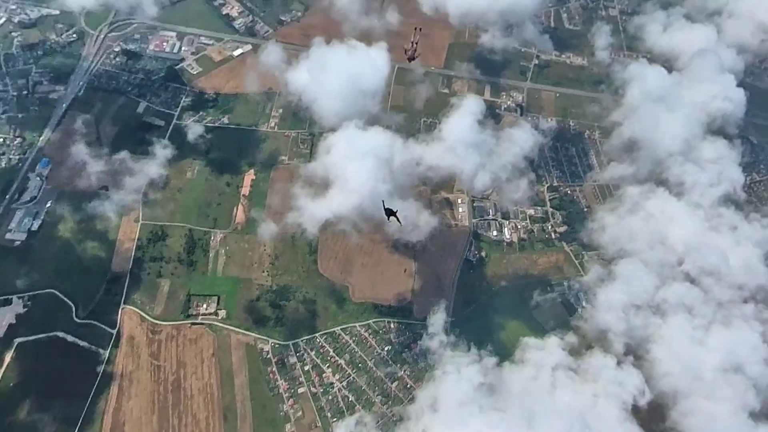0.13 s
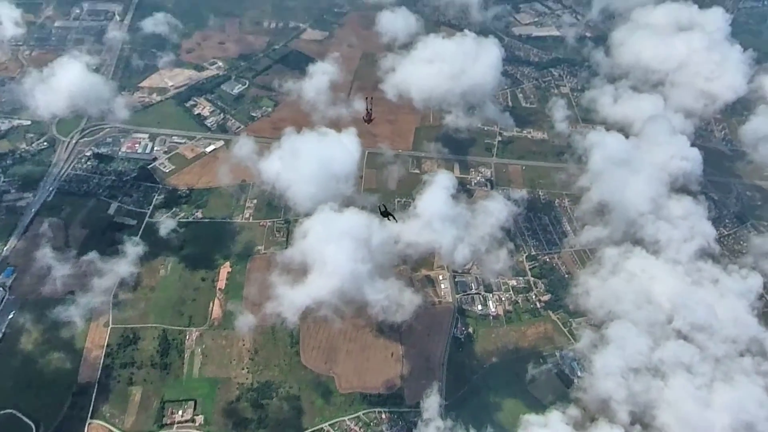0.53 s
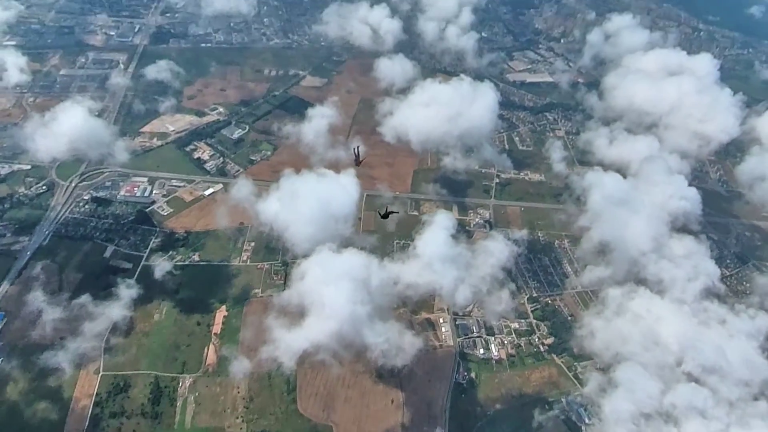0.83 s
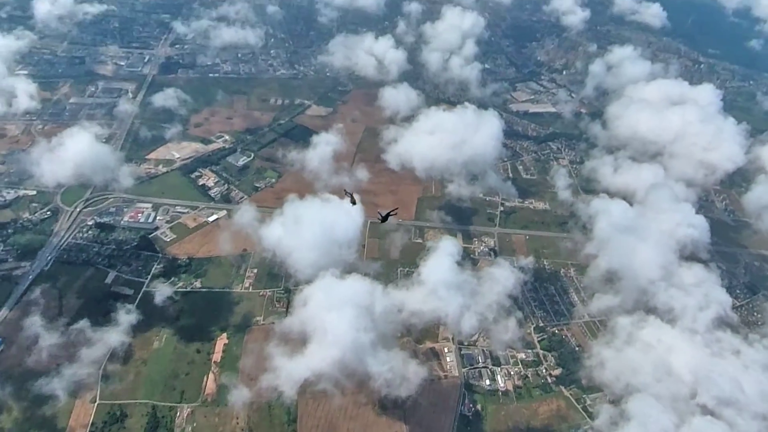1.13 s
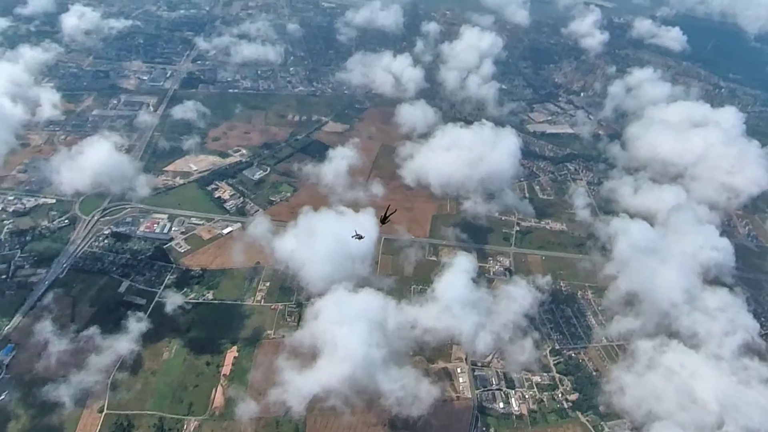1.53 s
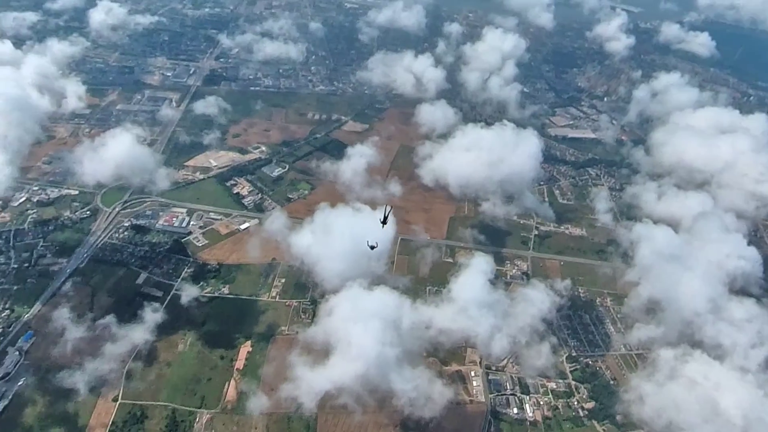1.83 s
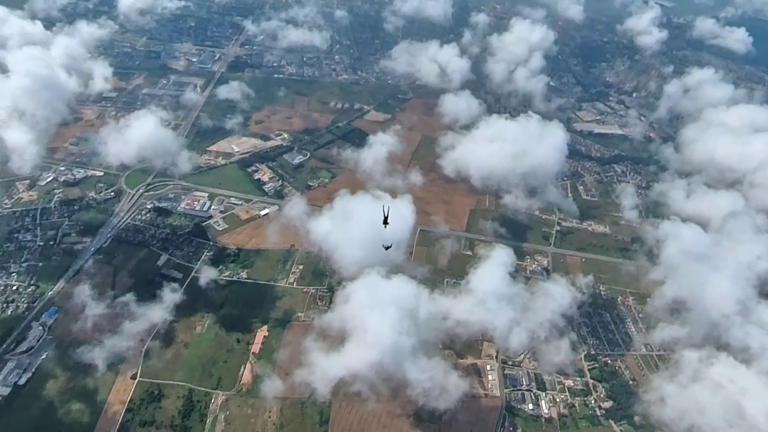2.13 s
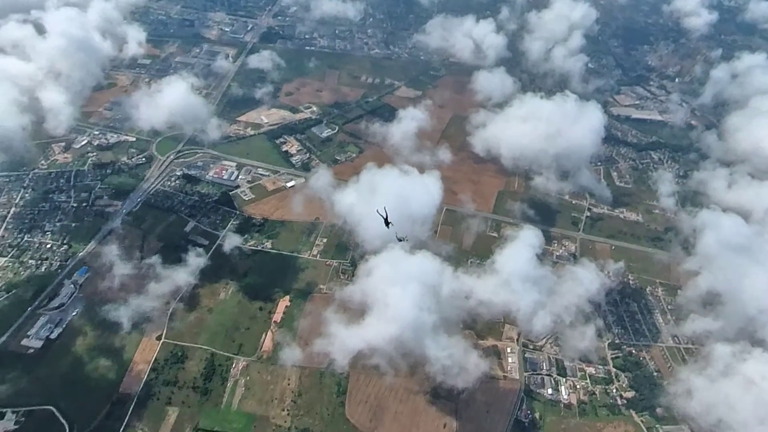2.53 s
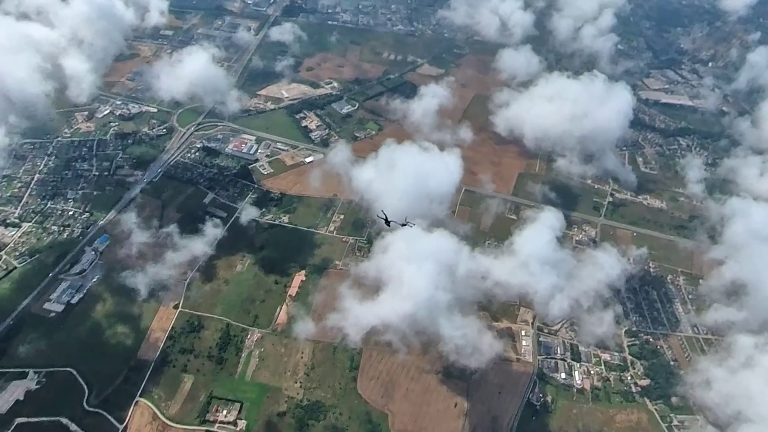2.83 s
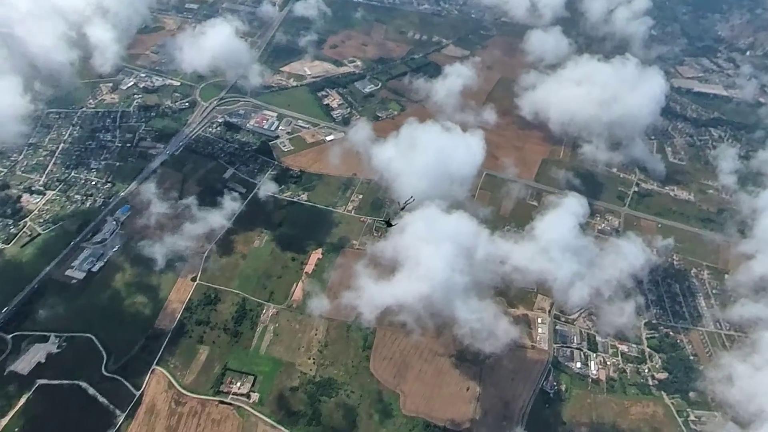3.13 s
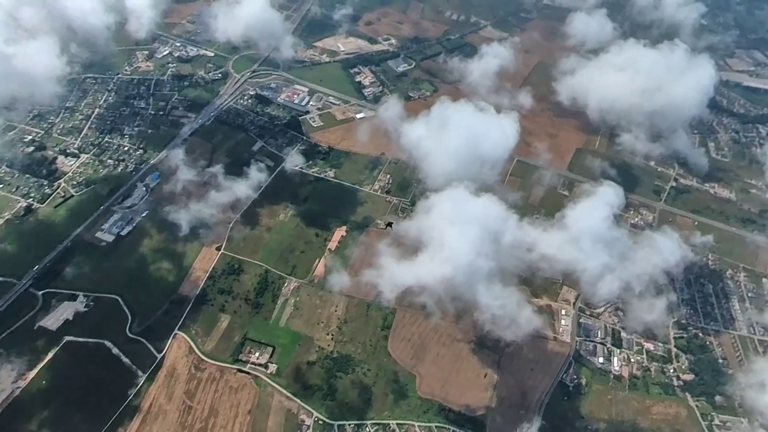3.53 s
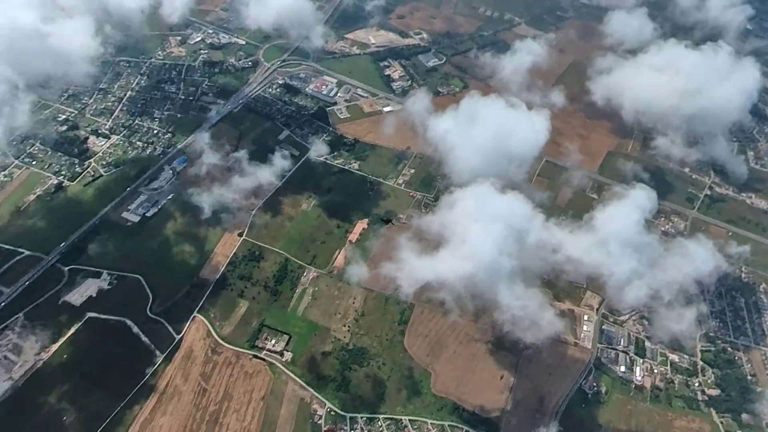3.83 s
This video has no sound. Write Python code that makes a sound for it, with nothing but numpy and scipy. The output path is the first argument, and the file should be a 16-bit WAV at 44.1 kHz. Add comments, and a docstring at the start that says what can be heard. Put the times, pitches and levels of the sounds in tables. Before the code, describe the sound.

Loud wind rushing over a falling camera's microphone, breaking into choppy flutters and swelling back unevenly

```python
"""Rushing air tears across the microphone of a falling camera: a low buffet, a roar, a midrange and a hiss,
all made of unevenly driven, filtered noise. The port slips into the lee for a moment, then takes the
full stream. Later the stream detaches and slaps back in choppy puffs, sinks, and returns in uneven swells.
Puffs are gated noise with a sinking tone over a pressure dip; slaps are rounded pushes, ticks are short
filtered clicks, and a brief whistle is a sliding narrow band of noise."""
import sys
import numpy as np
from scipy import signal
from scipy.fft import rfft, irfft, next_fast_len
from scipy.io import wavfile
from scipy.ndimage import uniform_filter1d, minimum_filter1d, map_coordinates

SR = 44100
rng = np.random.default_rng(int(sys.argv[2]) if len(sys.argv) > 2 else 0)


def transcribe(signal):
    """Save signal, clipped to [-1, 1], as a 16-bit WAV file at the path in sys.argv[1]."""
    frames = np.atleast_2d(signal).T
    limited = np.clip(frames, -1, 1)
    pcm = np.round(limited * 32767).astype(np.int16)
    wavfile.write(sys.argv[1], SR, pcm)


N = 176400  # samples in the scene: 4 s


def amp(db):
    """Turn decibels into a gain."""
    return 10 ** (np.asarray(db) / 20)


def unit(x):
    """Scale a sound to rms 1."""
    return x / np.sqrt(np.mean(x ** 2) + 1e-20)


def curves(rows):
    """Join the rows of a table with straight lines: one curve for each column after the time."""
    times, *columns = np.transpose(rows)
    t = np.arange(N) / SR
    return [np.interp(t, times, column) for column in columns]


def wobble(rate):
    """Draw a smooth curve through random points, rate of them a second."""
    points = rng.standard_normal(8192)
    return map_coordinates(points, [np.arange(N) * rate / SR], mode="wrap")


def coloured(x, points):
    """Filter x to a drawn frequency response, with the minimum-phase filter so nothing rings early."""
    size = next_fast_len(len(x) + 8192, True)
    hz, db = np.transpose(points)
    # the response is drawn on a logarithmic frequency scale
    level_db = np.interp(np.log(np.fft.rfftfreq(size, 1 / SR) + 1), np.log(hz + 1), db)
    # folding the cepstrum onto positive times makes the filter causal
    cepstrum = irfft(np.log(amp(level_db)), size)
    cepstrum[1:size // 2] *= 2
    cepstrum[size // 2 + 1:] = 0
    response = np.exp(rfft(cepstrum))
    return irfft(rfft(x, size) * response, size)[:len(x)]


def narrow_noise(hz, half_width_hz):
    """Make a narrow band of noise of rms 1 around a moving pitch: slow noise carried on a tone."""
    lowpass = signal.butter(3, half_width_hz, fs=SR, output="sos")
    a, b = signal.sosfilt(lowpass, rng.standard_normal((2, N)))
    phase = 2 * np.pi * np.cumsum(hz) / SR
    return unit(a * np.cos(phase) + b * np.sin(phase))


def add(track, s, x):
    """Mix x into the track at time s."""
    start = max(0, round(s * SR))
    track[start:start + len(x)] += x[:max(0, len(track) - start)]


LEAK_HZ = 37.5  # the port leaks pressure away below this frequency


def leaked(pressure):
    """Let slow changes of pressure leak out of the port, as a high-pass filter does."""
    b, a = signal.butter(2, LEAK_HZ, "high", fs=SR)
    return signal.lfilter(b, a, pressure)


def faint_hiss():
    """A very faint steady hiss: plain white noise at -102 dB."""
    return amp(-102) * rng.standard_normal(N)


# an airy whistle off an edge [t/s, f/Hz, level/dB]
WHISTLE_PATH = [(.812, 2880, -70), (.826, 2860, -54.5), (.925, 2690, -50.5), (.955, 2600, -70)]


def whistle():
    """Air whistles off an edge: a narrow band of noise slides down briefly."""
    hz, db = curves(WHISTLE_PATH)
    t = np.arange(N) / SR
    sounding = (t > WHISTLE_PATH[0][0]) & (t < WHISTLE_PATH[-1][0])
    return sounding * amp(db) * narrow_noise(hz, half_width_hz=285)


# small sharp ticks on the port [t/s, peak level/dB]
TICK_TIMES = [(.0325, -40), (.0705, -35), (.504, -43), (.514, -32), (2.744, -40), (3.384, -35)]
# frequency response that shapes a tick [f/Hz, relative level/dB]
TICK_COLOUR = [(30, -3.5), (300, -6.5), (1000, -10.5), (2500, -17), (5000, -26), (7000, -29.5),
               (8500, -58.5)]


def ticks():
    """Each tick is a single sharp jolt of pressure: one impulse, filtered."""
    out = np.zeros(N)
    tick = coloured(signal.unit_impulse(1024), TICK_COLOUR)
    tick /= np.abs(tick).max()
    for s, peak_db in TICK_TIMES:
        add(out, s, amp(peak_db) * tick)
    return out


# slaps: the stream strikes the port head-on [t/s, peak level before the leak/dB]
SLAP_TIMES = [(.0328, -8), (0.0714, -11.5), (1.133, -10), (2.636, -16), (2.7123, -6.5), (2.758, -10),
              (2.8092, -9), (2.8519, -13.5), (2.9316, -2.5), (3.4025, -11.5), (3.8001, -5), (3.826, -9),
              (3.858, -16), (3.9476, -11), (3.978, -10)]
SLAP_RISE_S = 0.0013  # time to the top of the push, before the leak


def slaps():
    """Each slap is one rounded push of pressure that leaks away, heard as a low thump."""
    out = np.zeros(N)
    rises = np.arange(4096) / SR / SLAP_RISE_S  # time counted in rise times
    push = leaked((rises * np.exp(1 - rises)) ** 3)
    for s, peak_db in SLAP_TIMES:
        add(out, s, amp(peak_db) * push)
    return out


# puffs of air tearing at the port; levels are before the gains in puffs()
# [t/s, length/s, gush level/dB, middle pitch of the gush f/Hz, suction level/dB]
PUFF_TIMES = [ (.017, .005, -36, 150, -21), (.029, .004, -21, 300, -13), (.039, .011, -22, 260, -24),
              (.052, .010, -19, 300, -25), (.063, .008, -15, 300, -22), (0.623, 0.0063, -29, 150, -27),
              (0.829, 0.0088, -26.5, 120, -17.5), (1.136, 0.0081, -28, 100, -21),
              (2.632, 0.0095, -18, 435, -24.5), (2.647, 0.0031, -17.5, 300, -31),
              (2.658, 0.0038, -18, 399, -23), (2.663, 0.0089, -32, 460, -29),
              (2.678, 0.0032, -20, 400, -21), (2.69, 0.0027, -19.5, 444, -18),
              (2.702, .011, -20.5, 500, -24.5), (2.758, 0.0097, -15.5, 481, -14),
              (2.808, .009, -24, 230, -14), (2.851, .017, -18, 290, -22.5),
              (2.876, 0.0076, -24.5, 350, -24), (2.899, 0.015, -23.5, 440, -17.5),
              (2.927, .017, -21, 375.5, -20.5), (3.398, 0.0078, -19, 250, -11.5),
              (3.664, 0.0068, -31, 180, -15), (3.821, 0.0063, -19.5, 250, -12),
              (3.837, .007, -18.5, 220, -21), (3.94, 0.0043, -21.5, 200, -14), (3.98, 0.005, -25, 200, -19),
              (3.992, 0.007, -26, 150, -18.5)]
# frequency response that shapes the rough air of a puff [f/Hz, relative level/dB]
PUFF_COLOUR = [(10, -31.5), (80, -3), (200, 5), (450, -1), (700, -5.5), (1000, -18.5), (1500, -29.5),
               (2800, -42), (4000, -52.5), (6000, -60.5), (7500, -74.5), (10000, -102)]
GUSH_ATTACK_S, GUSH_SAG_DB = 0.0014, 1.5  # a gush starts abruptly and weakens a little before it is cut off
TONE_DB, ROUGH_DB, GUSH_DB = -3.5, -3.5, 0.8  # gains of the hollow tone, the rough air, and both together
TONE_FALL_OCTAVES = 0.46
SUCTION_SKEW = 1.17  # before the leak, the suction peaks slightly after the middle of the puff


def puffs():
    """Each puff is a short gush of rough air with a sinking hollow tone, on a drop in pressure that rebounds."""
    out = np.zeros(N)
    t = np.arange(4096) / SR
    for s, length, gush_db, hz, suction_db in PUFF_TIMES:
        progress = np.clip(t / length, 0, 1)
        attack = 1 - np.exp(-t / GUSH_ATTACK_S)
        gate = attack * amp(-GUSH_SAG_DB * progress) * (progress < 1)
        rough = coloured(rng.standard_normal(len(t)) * gate, PUFF_COLOUR)
        # equal strength for any length: as much energy as noise of rms 1 lasting as long as the puff
        rough *= np.sqrt(length * SR / np.sum(rough ** 2))
        pitch = hz * 2 ** (TONE_FALL_OCTAVES * (.5 - progress))
        cycles = np.cumsum(pitch) / SR + rng.random()
        tone = 2 * np.sin(np.pi * progress) * np.sin(2 * np.pi * cycles)
        gush = amp(ROUGH_DB) * rough + amp(TONE_DB) * tone
        suction = leaked(-2 * np.sin(np.pi * progress ** SUCTION_SKEW) ** 2)
        add(out, s, amp(gush_db + GUSH_DB) * gush + amp(suction_db) * suction)
    return out


def turbulence(colour, swing_db):
    """Make noise of rms 1, driven unevenly by eddies and then coloured by the port."""
    driven = rng.standard_normal(N) * amp(swing_db)
    return unit(coloured(driven, colour))


# level of the low buffet relative to the airstream's roar column [t/s, level/dB]
BUFFET_LEVEL = [(.2, -4), (.4, -2.5), (.53, -12), (.65, -4), (1.15, -4.5), (1.6, -6.5), (2.5, -2), (3.0, 0),
                (3.2, -8), (3.39, 1), (3.5, -0.5), (3.7, -1.5), (3.95, 5)]
# frequency response of the buffet [f/Hz, relative level/dB]
BUFFET_COLOUR = [(10, -24), (25, -9.5), (45, -1.5), (85, 1.5), (130, 1.5), (200, -16), (400, -23.5),
                 (1000, -82.5), (3000, -120)]


def buffet(roar_db, swing_db):
    """Low, lumpy noise: it shares the swings of the stream and adds slower gusts of its own."""
    level_db, = curves(BUFFET_LEVEL)
    gusts_db = 0.5 * wobble(14)  # 14 random points a second
    return amp(roar_db + level_db) * turbulence(BUFFET_COLOUR, 1.4 * swing_db + gusts_db)


# middle pitch of the vortices shed beside the port, lower where the stream is unsettled [t/s, f/Hz]
VORTEX_PITCH = [(.54, 185), (.95, 370.1), (2.5, 359.4), (3.2, 229.7)]
DRIFT_HZ, DRIFT_OCTAVES = 11, .3  # random points a second in the pitch drift, and its size
VORTEX_HALF_WIDTH_HZ, VORTEX_DB = 46.7, -9  # level is relative to the airstream's roar column


def vortices(roar_db):
    """Vortices shed beside the port give a hollow, drifting tone: a narrow band of noise."""
    pitch, = curves(VORTEX_PITCH)
    drifting = pitch * 2 ** (DRIFT_OCTAVES * wobble(DRIFT_HZ))
    return amp(roar_db + VORTEX_DB) * narrow_noise(drifting, VORTEX_HALF_WIDTH_HZ)


# the airstream at the port, one table for each stretch; roar and hiss levels are before their gains
# all six: [t/s, roar level/dB, midrange level/dB, hiss level/dB]
OPENING_AIR = [(0, -32, -37, -55), (.016, -38, -50, -68), (.07, -37, -47, -75), (.083, -48, -66, -84)]
LEE_AIR = [(0.109, -55.5, -76, -81), (.133, -60, -89, -105), (.148, -90, -98, -108), (.25, -77, -87, -106),
           (.35, -68, -80, -97.5), (0.482, -58.5, -69.5, -87)]
ENTRY_AIR = [(0.497, -38, -47.5, -67), (0.514, -32.5, -39, -61), (0.515, -14, -19, -46.5)]
FULL_STREAM = [(0.524, -18, -31, -46), (0.545, -17, -29, -48), (0.566, -14.5, -28.5, -47),
               (0.59, -20, -31, -49.5), (0.77, -22, -32.5, -48.5), (1.13, -22.5, -32, -47.5),
               (1.14, -29, -35.5, -52.5), (1.189, -21, -35, -47), (1.33, -23, -32.5, -48.5),
               (1.461, -22, -30.5, -46), (2.239, -23, -32.5, -46), (2.26, -22, -29.5, -46.5),
               (2.39, -24.5, -37, -49), (2.45, -21.5, -30, -47.5), (2.57, -24, -33, -48),
               (2.611, -20, -30.5, -48)]
DETACHED_AIR = [(2.619, -21.5, -44, -57.5), (2.642, -43, -61, -71.5), (2.712, -35.5, -56, -62),
                (2.726, -49, -72, -86), (2.841, -45.5, -67, -76), (2.931, -41.5, -59, -72)]
RETURNING_AIR = [(2.96, -34, -49.5, -67.5), (2.976, -40.5, -47, -63.5), (3.168, -25, -33.5, -52),
                 (3.235, -27.5, -29.5, -51), (3.284, -19.5, -28, -48), (3.334, -30, -41, -61),
                 (3.344, -23.5, -30, -48.5), (3.39, -20, -29, -47.5), (3.406, -32, -34, -54),
                 (3.426, -33, -37.5, -59), (3.562, -28, -33.5, -52), (3.608, -29, -38, -55),
                 (3.626, -23.5, -31.5, -52), (3.66, -26.5, -28.5, -46.5), (3.685, -26, -32.5, -50.5),
                 (3.774, -23, -37, -53), (3.798, -28, -44, -58), (3.818, -32, -41, -62),
                 (3.826, -25.5, -39, -59), (3.842, -27, -37, -61), (3.85, -40, -48, -66),
                 (3.868, -32.5, -44, -62), (3.898, -24.5, -39.5, -56.5), (3.97, -29, -46, -59.5)]
# frequency responses of the roar, the midrange and the hiss [f/Hz, relative level/dB]
ROAR_COLOUR = [(30, -22), (90, -9.5), (170, 1.5), (280, 0.9), (450, -2.5), (650, -8.5), (1000, -31.5),
               (1400, -38), (2000, -52), (3500, -62), (8000, -100)]
MID_COLOUR = [(200, -31), (500, -2), (750, -0.5), (1100, -8.5), (1500, -16.5), (2200, -31), (5000, -76.5)]
HISS_COLOUR = [(200, -16.5), (700, -8), (1200, -3.5), (1650, 2), (2200, -5), (2750, -6.5), (3400, -13.5),
               (4500, -19.5), (5800, -26.5), (6700, -35), (7500, -48.5), (9000, -78)]
ROAR_DB, HISS_DB = -0.12, 0.9  # gains added to the table levels
# fine and coarse unsteadiness: random points a second, and size before each layer takes its share
EDDY_HZ, EDDY_DB, FLUTTER_HZ, FLUTTER_DB = 258.5, 1.5, 44.5, 0.55


def airstream():
    """Buffet, roar, midrange and hiss share the same eddies and flutter; a vortex tone drifts through the roar."""
    roar_db, mid_db, hiss_db = curves([*OPENING_AIR, *LEE_AIR, *ENTRY_AIR, *FULL_STREAM,
                                       *DETACHED_AIR, *RETURNING_AIR])
    swing_db = EDDY_DB * wobble(EDDY_HZ) + FLUTTER_DB * wobble(FLUTTER_HZ)
    low = buffet(roar_db, swing_db)
    roar = amp(roar_db + ROAR_DB) * turbulence(ROAR_COLOUR, 0.87 * swing_db)
    mid = amp(mid_db) * turbulence(MID_COLOUR, 0.49 * swing_db)
    hiss = amp(hiss_db + HISS_DB) * turbulence(HISS_COLOUR, 0.9 * swing_db)
    return low + roar + vortices(roar_db) + mid + hiss


def scene():
    """Add up all the air on one microphone, over a very faint steady hiss."""
    mix = faint_hiss() + whistle() + ticks() + slaps() + puffs() + airstream()
    return mix[None]  # one channel


CEILING, LIMITER_S = .46, .004  # level where the limiter starts, and its smoothing time
TOP_HZ = 15800  # the camera's band limit


def record(dry):
    """A fast limiter holds down the hardest blows, then a steep low-pass filter sets the camera's band limit."""
    size = round(LIMITER_S * SR)
    gain = CEILING / np.maximum(np.abs(dry), CEILING)
    gain = minimum_filter1d(gain, 2 * size)  # spread each dip to both sides of its peak
    gain = uniform_filter1d(uniform_filter1d(gain, size), size)  # round off the dips
    lowpass = signal.butter(12, TOP_HZ, fs=SR, output="sos")
    return signal.sosfilt(lowpass, dry * gain)


dry = scene()
out = record(dry)
transcribe(out)
```